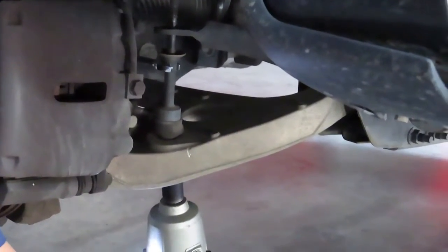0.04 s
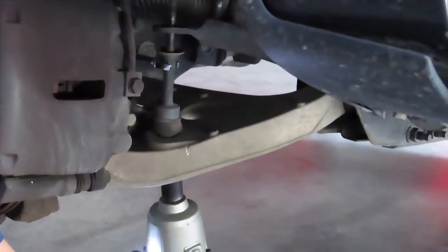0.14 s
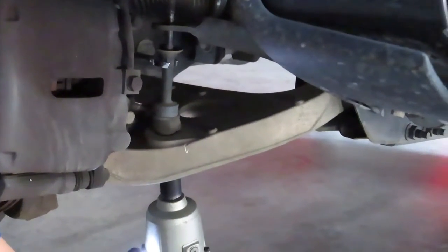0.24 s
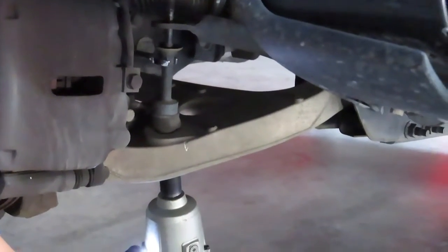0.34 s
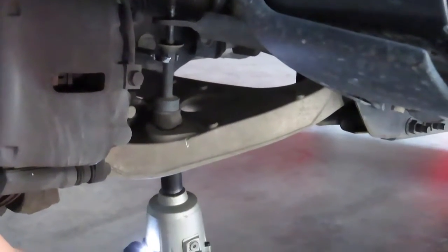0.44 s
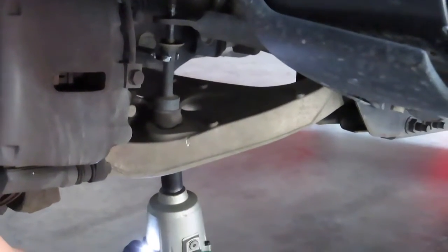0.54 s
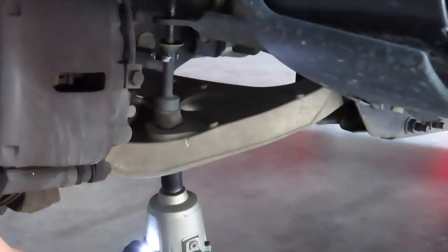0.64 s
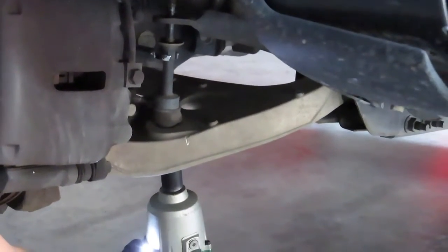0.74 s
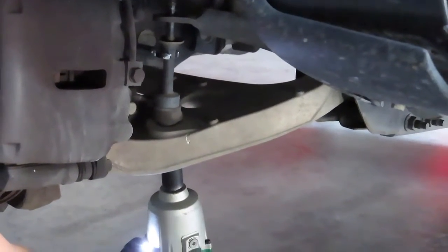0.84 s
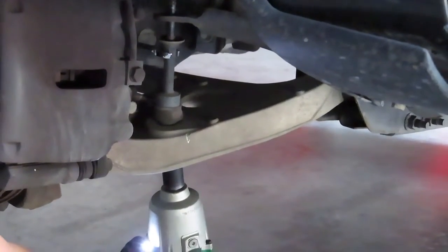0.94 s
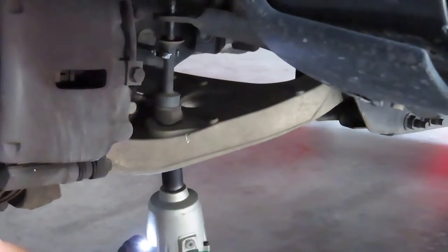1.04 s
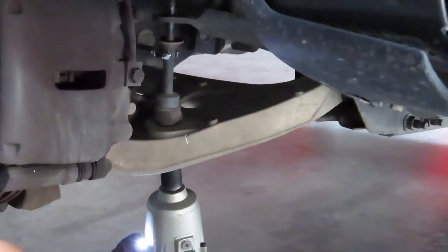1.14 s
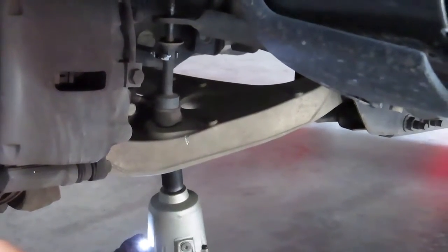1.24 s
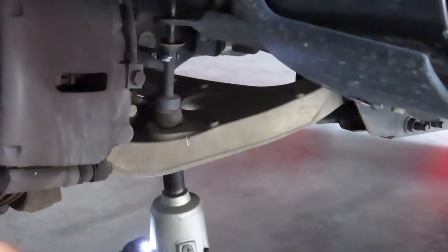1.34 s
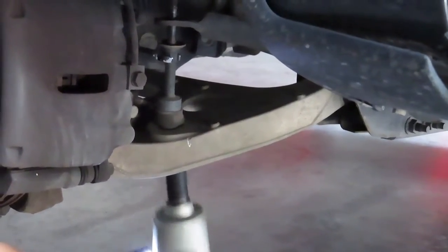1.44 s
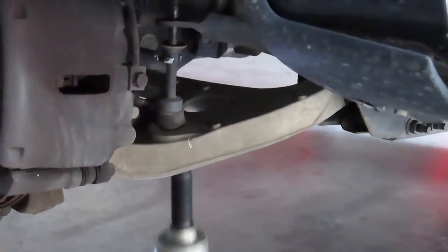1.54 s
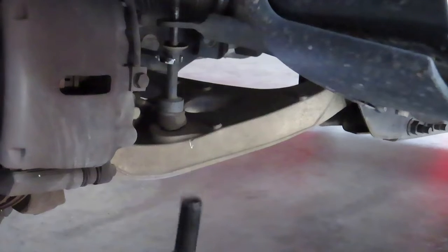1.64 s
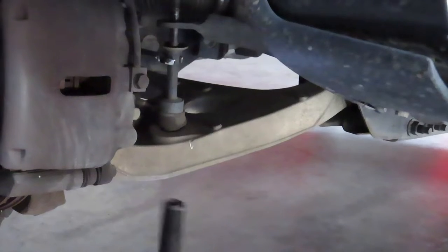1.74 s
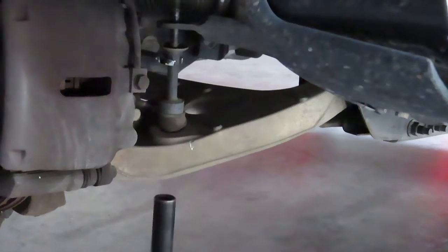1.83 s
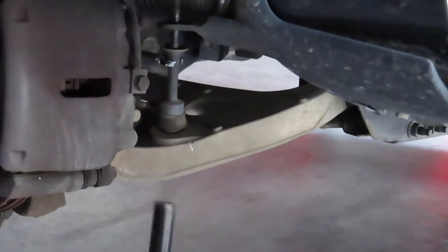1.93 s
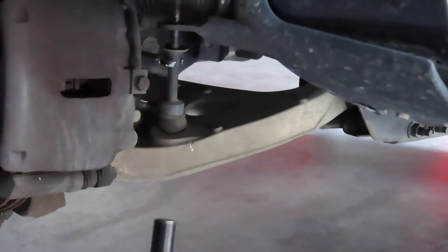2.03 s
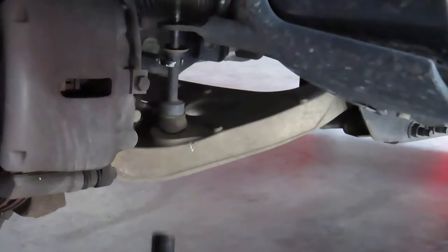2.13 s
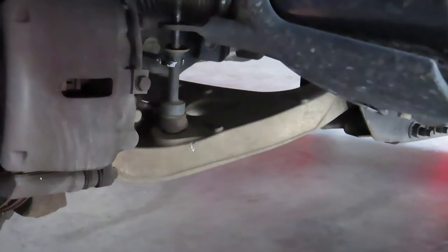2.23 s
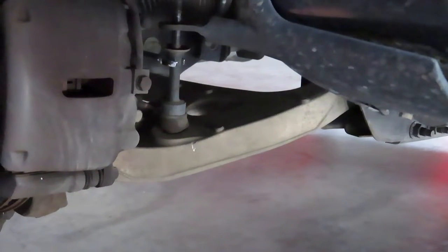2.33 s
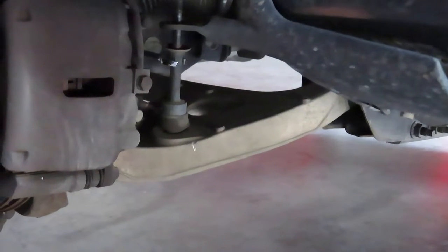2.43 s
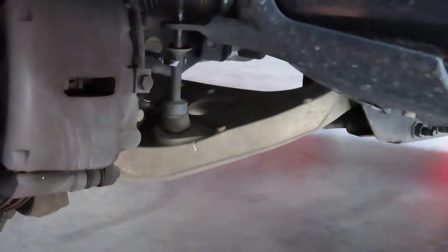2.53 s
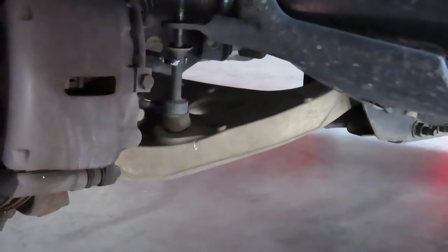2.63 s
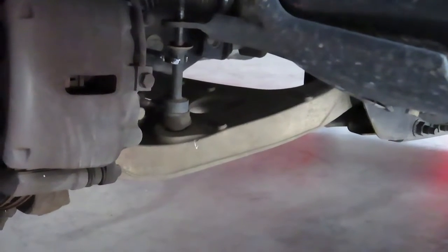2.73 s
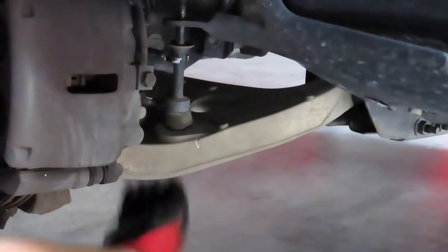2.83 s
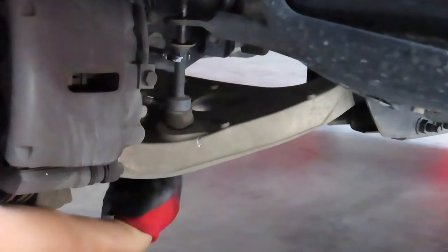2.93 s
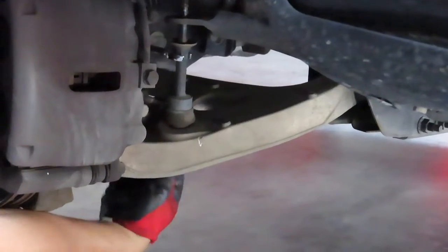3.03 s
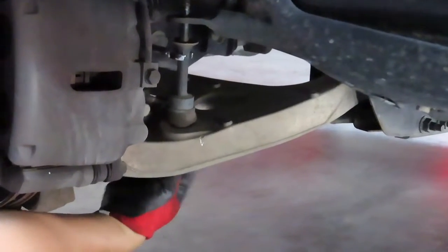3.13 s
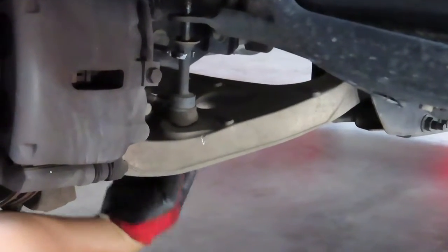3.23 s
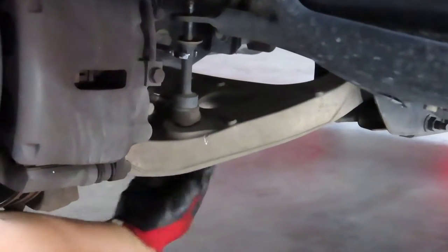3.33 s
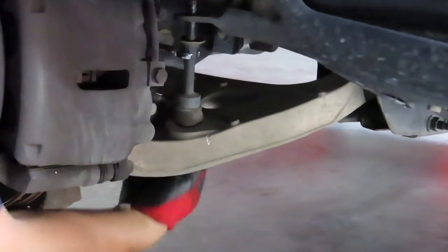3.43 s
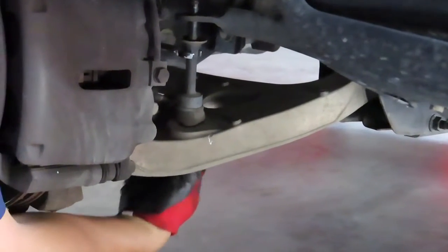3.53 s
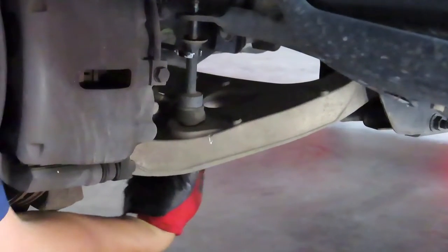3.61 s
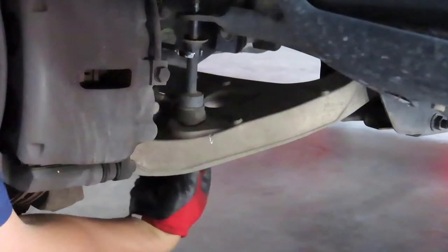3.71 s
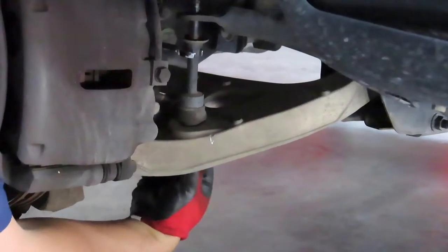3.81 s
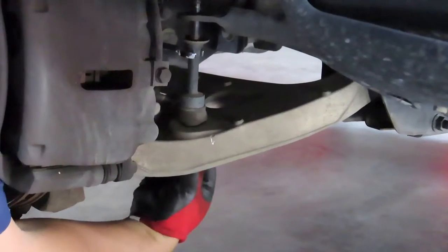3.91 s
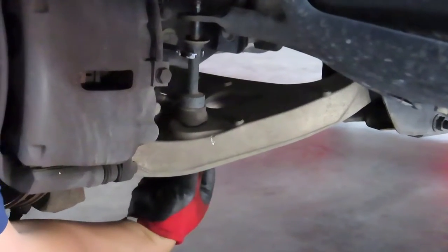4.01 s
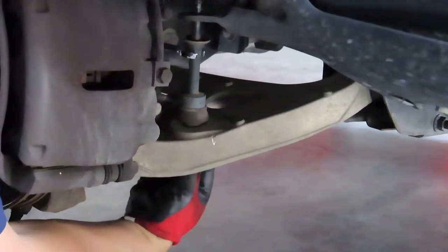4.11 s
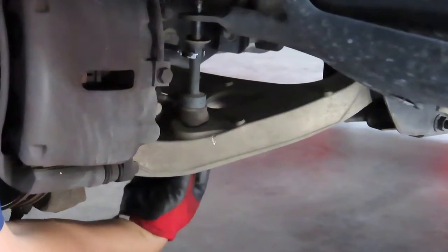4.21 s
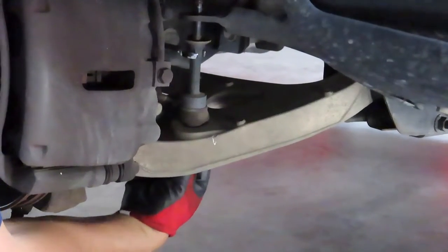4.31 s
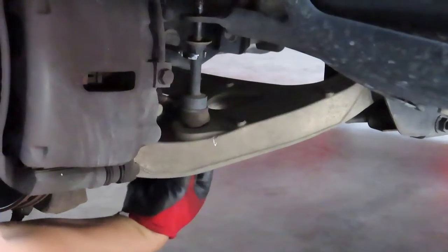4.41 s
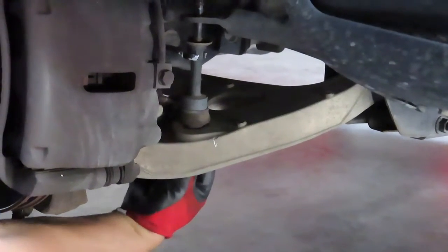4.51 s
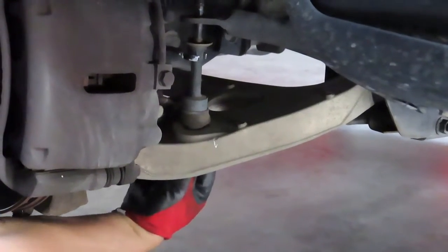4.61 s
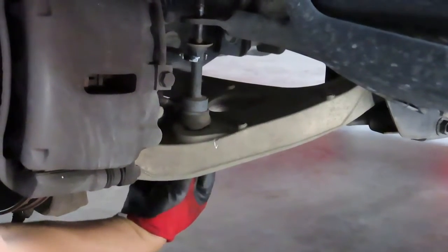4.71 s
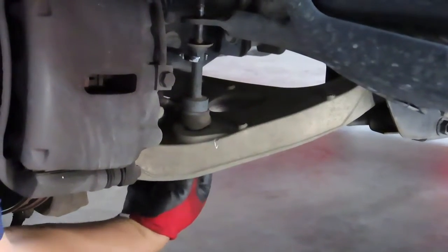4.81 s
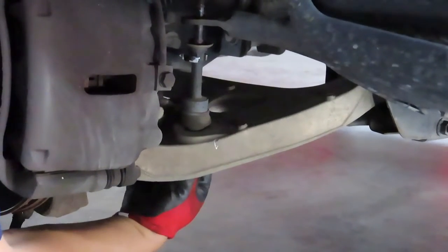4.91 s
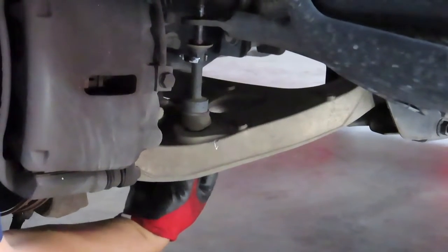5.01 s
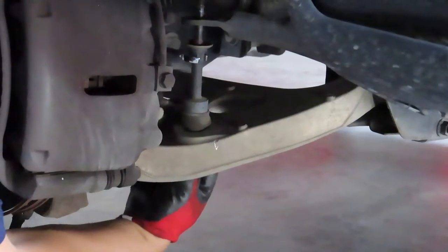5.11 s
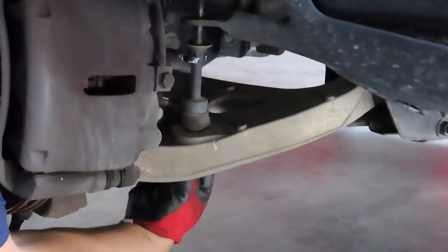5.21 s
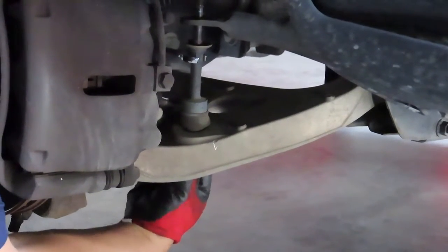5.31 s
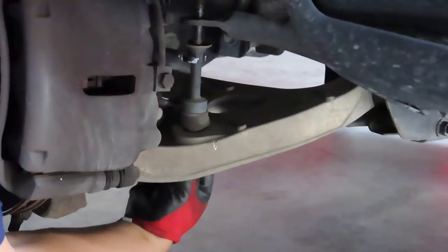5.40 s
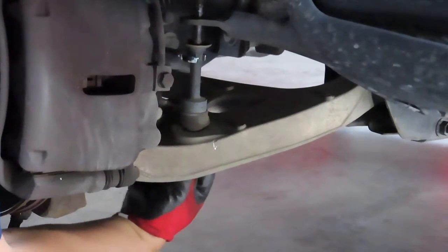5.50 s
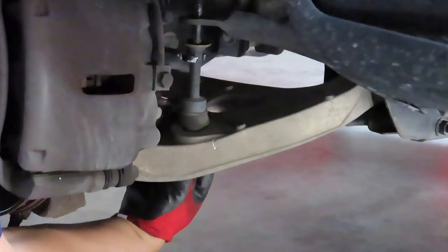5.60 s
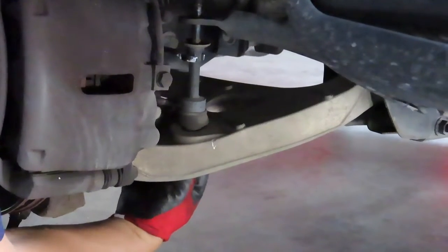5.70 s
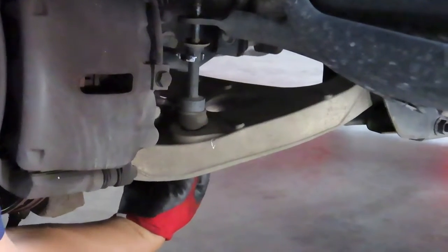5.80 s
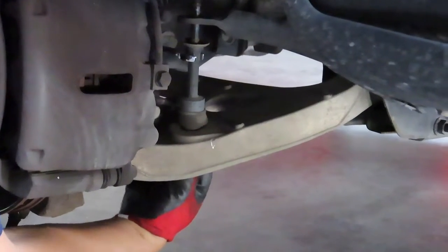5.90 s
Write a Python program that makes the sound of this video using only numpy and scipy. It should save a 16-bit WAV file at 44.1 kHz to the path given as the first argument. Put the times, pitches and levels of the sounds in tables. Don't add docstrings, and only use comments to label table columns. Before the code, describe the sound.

Close under a car, a cordless power tool whines at a steady high pitch while its socket rattles on a nut. It slips off with sharp metallic knocks, speeds up briefly with airy fan rush, then winds down. The tool is laid on concrete with loud clacks and a short scrape, leaving glove rustles, faint bird calls and low distant traffic.

```python
import sys
import numpy as np
from scipy import signal
from scipy.fft import rfft, irfft, next_fast_len
from scipy.io import wavfile
from scipy.ndimage import uniform_filter1d

SR = 44100
rng = np.random.default_rng(int(sys.argv[2]) if len(sys.argv) > 2 else 0)


def store_pcm(level_fs):
    pcm = np.round(np.clip(level_fs, -1, 1) * 32767).astype(np.int16)
    wavfile.write(sys.argv[1], SR, np.atleast_2d(pcm).T)


def to_linear_factor(level_db):
    exponent = np.asarray(level_db, float) / 20
    return 10 ** exponent


N = 262420

# f/Hz, level/dB
TRAFFIC_COLOUR = [(12, -41), (20, -15.5), (59, -4.5), (85, -2.5), (148, -6.5), (171, -11.5), (202, -14.5),
                  (352, -22.5), (667, -21.5), (1580, -34.5), (1770, -35), (4950, -45), (7310, -50.5),
                  (7950, -52), (15500, -64.5)]
# t/s, length/s, top note f/Hz, level/dB
BIRD_CALLS = [
    (3.179, .42, 4460, -48.5),
    (3.629, .43, 4324, -46.5),
]
# part of call/0-1, churr f/Hz, churr level/dB, top note level/dB
CALL_SHAPE = [
    (0, 3304, -6, -34),
    (.17, 3450, -3, -16),
    (.24, 3750, 1, -2),
    (.42, 3950, 0, -2),
    (.52, 3450, 3.5, -6),
    (.7, 3200, -3, -16),
    (1, 3160, -16, -30),
]
# t/s, length/s, f/Hz, glide/Hz, level/dB
FAR_TONES = [
    (5.197, .06, 7420, -150, -59),
    (5.641, 0.346, 1710, 120, -65),
]
# t/s, peak level/dB
RUSTLES = [(3.0779, -37.5), (3.2221, -33.5), (3.362, -30.5), (3.5794, -36.5), (3.6486, -33.5),
           (4.2194, -46), (4.8644, -43), (4.8964, -44), (5.0794, -41), (5.1094, -43)]
# t/s, crack peak level/dB, ring f/Hz, thud peak level/dB, thud f/Hz
KNOCKS = [(1.556, -15.5, 9160, -30, 293), (1.604, -9, 1490, -21, 372), (1.611, -14.5, 9400, -19, 300),
          (2.095, -42, 1508, -18, 170), (2.115, -44, 1500, -22, 125), (2.5613, 1.5, 2960, -6.5, 175),
          (2.562, -18, 620, -23.5, 330), (2.624, 0.5, 2160, -2.5, 338), (2.629, -3, 2900, -6.5, 550),
          (2.648, -19, 3260, -26, 320), (2.688, -17, 2940, -19, 710), (2.7784, -14.5, 900, -17, 500),
          (2.782, -17, 2520, -17, 300), (2.801, -23, 3450, -25, 500), (2.819, -8.5, 2830, -16.5, 691),
          (2.841, -30.5, 2500, -25, 600), (2.889, -25, 3000, -27, 400), (2.893, -32, 2980, -15, 752),
          (2.915, -28, 3020, -24.5, 786), (4.865, -39, 1500, -35, 600), (4.897, -41, 1500, -37, 600)]
# t/s, level/dB
SETTLING = [
    (2.56, -26),
    (2.686, -25.5),
    (2.766, -31),
    (2.886, -32.5),
    (2.95, -54),
]
# f/Hz, level/dB
AIR_COLOUR = [(120, -35), (200, -2.5), (446, -25.5), (653, -2.5), (890, -5), (1190, -5.5), (1590, 1),
              (2130, -5), (3070, 1), (4840, -12.5), (8500, -19), (13200, -33), (15500, -44)]
# f/Hz, level/dB
RATTLE_COLOUR = [(35, -48), (70, -22.5), (150, -9.5), (242, -10), (1050, -11), (1380, -12), (1790, -13),
                 (2150, -16), (2590, -6), (3270, -16), (4120, -16.5), (6260, -23), (9740, -27.5),
                 (15500, -40)]
# f/Hz, width/Hz, level/dB
SOCKET_MODES = [(229.5, 24, -2), (373.5, 14, 6.5), (1403, 170, -3), (1619, 13, 6.5), (2836, 41, -1.5),
                (2880, 26, 4), (3770, 300, -14), (4285, 77, -2.5), (9630, 23, -8), (11400, 100, -18)]
# t/s, f/Hz, level/dB, throb depth/0-1
MESH = [(0, 1413, -19.5, 0.9), (.3, 1394, -20.5, 0.4), (.7, 1389, -20.5, 0.67), (.95, 1403, -21, 0.6),
        (1.15, 1401, -14.5, 0.28), (1.3, 1403, -19, 0.34), (1.5, 1396, -17, 0.32), (1.53, 1405, -31, 0.53)]
# t/s, f/Hz
DRAG = [
    (0, 2578),
    (.2, 2562),
    (.3, 2528),
    (1.1, 2545),
    (1.3, 2560),
    (1.5, 2563),
]
# t/s, level/dB
FACING = [(0, -4.5), (.2, -0.5), (1.24, -1.5), (1.285, -18), (1.32, -1.5), (1.5, -5), (1.56, 0.5),
          (1.635, 2.5), (1.75, -4.5), (1.823, 0.5), (1.87, -6), (1.915, -2), (1.935, -14), (1.96, -1),
          (2.3, -1), (2.56, -0.5)]
# multiple of whine, housing resonance f/Hz, width/Hz, level/dB
MOTOR_LINES = [(1, 2874, 344, -18.5), (1, 2520, 400, -25.5), (1, 1180, 100, -38), (1, 1900, 730, -41),
               (1, 760, 170, -22.5), (2, 5770, 200, -32), (2, 5100, 300, -38), (2, 3650, 450, -23),
               (2, 2900, 1800, -42), (2, 2300, 400, -35), (2, 1700, 350, -31), (2, 780, 350, -21),
               (3, 7550, 870, -30.5), (3, 8650, 300, -34), (3, 5600, 1800, -39), (3, 4300, 1490, -44),
               (5, 13600, 700, -41), (5, 7500, 2500, -49), (5, 4170, 760, -27.5), (1.5, 4200, 250, -32),
               (1.5, 3600, 1196, -42), (2.5, 3800, 1100, -46), (4, 11540, 300, -44), (7, 5000, 3000, -50),
               (.1, 263, 91, -39.5), (.5, 720, 200, -35),
               (.2, 580, 55, -38.5), (.25, 646, 203, -34.5), (.5, 900, 400, -43), (.55, 2300, 100, -43),
              (1.5, 4300, 210, -30.5), (1.5, 4050, 760, -34.5), (2.5, 3900, 2500, -56),
              (4, 5400, 3000, -47), (4, 15000, 1500, -49), (5.31, 15330, 300, -50), (6, 12000, 4000, -51.5),
              (7, 12000, 3000, -58)]
# f/Hz, side minus mid level/dB
NEAR_WIDTH = [(60, -47), (200, -47), (380, -35), (1290, -31.5), (2500, -24.5), (3300, -26), (6400, -22),
              (7000, -7), (15000, -5)]
# f/Hz, side minus mid level/dB
FAR_WIDTH = [(60, -42.5), (110, -44), (200, -17), (380, -5.5), (700, -13), (1290, -7.5), (2380, -6),
             (4400, -5.5), (8120, -3), (15000, -3)]

T, PAD = np.arange(N) / SR, next_fast_len(N)
HZ = np.fft.rfftfreq(PAD, 1 / SR) + 1e-3
SLIP_S, RELEASE_S, STOP_S = 1.522, 1.877, 2.93
LAID_S = 2.59
FREE_HZ = 2888


def unit(x):
    return x / np.sqrt(np.mean(x ** 2))


def to_peak(x, db):
    return x * to_linear_factor(db) / np.max(np.abs(x))


def shape(table):
    hz, db = np.transpose(table)
    return to_linear_factor(np.interp(np.log(HZ), np.log(hz), db))


def peak(hz, width):
    return 1 / (1 + 1j * (HZ / hz - hz / HZ) * hz / width)


def lowpass(hz):
    return 1 / (1 + 1j * HZ / hz)


def through(x, gain):
    return irfft(rfft(x, PAD) * gain, PAD)[:N]


def sweep(hz):
    return 2 * np.pi * np.cumsum(hz) / SR


def after(s, ramp_s):
    return np.clip((T - s) / ramp_s, 0, 1)


def decay(s, fall_s):
    return np.exp(-np.maximum(T - s, 0) / fall_s)


def curves(table, off_db=-120):
    s, *columns = np.transpose(table)
    gate_db = np.interp(T, [s[0] - .02, s[0], s[-1], s[-1] + .03], [off_db, 0, 0, off_db])
    return [np.interp(T, s, c) for c in columns], to_linear_factor(gate_db)


def walk(rate):
    hold = int(SR / rate)
    steps = np.repeat(rng.standard_normal(N // hold + 1), hold)
    slewed = uniform_filter1d(uniform_filter1d(steps, hold), hold)
    return unit(slewed[:N])


def flicker(gain, depth_db, rate):
    out = 0
    for hz in 30 * 2. ** np.arange(10):
        band = np.cos(np.clip(np.log2(HZ / hz), -1, 1) * np.pi / 2)
        noise = through(rng.standard_normal(N), gain * band)
        out = out + noise * to_linear_factor(depth_db * walk(rate))
    return unit(out)


def burst(s, t60, rise):
    age = np.maximum(T - s, 0)
    return rng.standard_normal(N) * (1 - np.exp(-age / rise)) * np.exp(-np.log(1000) * age / t60)


def echo(x, t60, db):
    tail = through(burst(0.0021, t60, 0.0011), lowpass(4000))
    return to_linear_factor(db) * through(x, rfft(tail / np.sqrt(np.sum(tail ** 2)), PAD))


def scatter(x, width):
    paths = burst(0, .3, .0001)
    return through(x, shape(width) * rfft(paths / np.sqrt(np.sum(paths ** 2)), PAD))


def traffic():
    return flicker(shape(TRAFFIC_COLOUR), 0.65, 14) * to_linear_factor(-36.5)


def far_tones():
    out = 0
    for s, length, hz, glide_hz, db in FAR_TONES:
        part = np.clip((T - s) / length, 0, 1)
        pitch = (hz + glide_hz * part) * (1 + .006 * walk(120))
        out = out + to_linear_factor(db) * np.abs(np.sin(np.pi * part)) ** 0.51 * np.sin(sweep(pitch))
    return out


def bird():
    out = 0
    for s, length, note_hz, db in BIRD_CALLS:
        timed = [(s + part * length, *rest) for part, *rest in CALL_SHAPE]
        (hz, churr_db, note_db), gate = curves(timed)
        angle = sweep(hz)
        breath = walk(950) * np.sin(angle) + walk(950) * np.cos(angle)
        churr = breath * to_linear_factor(churr_db + 2.5 * walk(60))
        note = np.sin(sweep(note_hz * (1 + 0.009 * walk(120)))) * to_linear_factor(note_db + 4.5 * walk(40))
        out = out + (0.57 * churr + .8 * note) * gate * to_linear_factor(db)
    return out


def rustles():
    hz, t60_s = 2330, 0.25
    cloth = peak(hz, 0.85 * hz) * lowpass(7000)
    return sum(to_peak(through(burst(s, t60_s, 0.0031), cloth), db - 5.5) for s, db in RUSTLES)


def settle():
    (db,), gate = curves(SETTLING)
    return flicker(peak(340, 220) + 0.73 * peak(750, 310), 2.4, 60) * to_linear_factor(db - 5.5) * gate


def knocks():
    out = 0
    for s, db, hz, thud_db, thud_hz in KNOCKS:
        t60 = 0.071 if s < RELEASE_S else .015 - .0005 * db
        dull = lowpass(1.47 * hz) ** 2 * lowpass(14000)
        ring = peak(hz, 0.69 * hz) + 0.43 * peak(960, 1600)
        crack = through(burst(s, t60, 0.0013), ring * dull)
        body = peak(thud_hz, 30 + 0.22 * thud_hz) + 0.37 * peak(177, 39) + 0.39 * peak(278, 50)
        thud = through(burst(s, 0.0049, 0.00057), body)
        thud = through(thud, lowpass(min(1800, 4 * thud_hz)) ** 2)
        out = out + to_peak(crack, db) + to_peak(thud, thud_db)
    return out


def air(hz):
    low_db, high_db = -27, -31.5
    low_db_per_oct, high_db_per_oct = 3, 4
    octaves, laid = np.log2(hz / FREE_HZ), after(LAID_S - .03, .07)
    puff_db = 7.5 * decay(SLIP_S + .05, 0.033)
    treble = 1 / (1 + (3800 / HZ) ** 4)
    rush = flicker(shape(AIR_COLOUR) * (1 - treble), 0.91, 40)
    rush = rush * to_linear_factor(low_db + low_db_per_oct * octaves - 6 * laid + puff_db)
    hiss = flicker(shape(AIR_COLOUR) * treble, 0.99, 40.16)
    hiss = hiss * to_linear_factor(high_db + high_db_per_oct * octaves - 7 * laid)
    return (rush + hiss) * after(SLIP_S + 0.024, 0.015) * (1 - after(STOP_S, 0.063))


def rattle(spindle):
    taps = rng.standard_normal(N) * to_linear_factor(2.53 * rng.exponential(size=N))
    taps = taps * (1 + 0.11 * np.cos(spindle + .6))
    modes = sum((-1) ** k * to_linear_factor(d) * peak(f, w) for k, (f, w, d) in enumerate(SOCKET_MODES))
    sound = unit(through(taps, shape(RATTLE_COLOUR))) + to_linear_factor(-3) * unit(through(taps, modes))
    parting_shake = after(1.6, .012) * decay(1.612, 0.031)
    return sound * to_linear_factor(-19.5 + 0.4 * walk(25.3)) * (decay(SLIP_S, .05) + 1.14 * parting_shake)


def gears():
    teeth = 66
    (hz, db, depth), gate = curves(MESH)
    angle = sweep(hz)
    spindle = angle / teeth + .3 * walk(12)
    swell = np.cos(spindle + 1.1) + 0.66 * np.cos(2 * spindle + 2.1)
    throb = 1 + depth * to_linear_factor(2.0 * walk(14.6)) * swell
    tone = np.sin(angle + 0.5 * walk(54))
    tone = tone + to_linear_factor(-18.0) * np.sin(3 * angle + .6 * walk(50))
    tone = tone + to_linear_factor(-27) * np.sin(5 * angle + walk(50))
    tone = tone + to_linear_factor(-28) * np.sin(6 * angle + walk(50))
    return 1.13 * to_linear_factor(db + 1.2 * walk(30.02)) * throb * tone * gate, spindle


def speed():
    spin_up_s, coast_s, friction_hz = .028, 1.02, 1600
    s, hz = np.transpose(DRAG)
    run = FREE_HZ - (FREE_HZ - np.interp(T, s, hz)) * decay(SLIP_S, spin_up_s)
    coast = (run + friction_hz) * decay(RELEASE_S, coast_s) - friction_hz
    return np.maximum(coast, 40)


def motor(hz):
    coast_lift_db, load_flutter_db = 8, 2.5
    angle = sweep(hz * (1 + .001 * walk(40.4)))
    lines = {}
    for k, f, w, d in MOTOR_LINES:
        lines[k] = lines.get(k, 0) + to_linear_factor(d) / (1 + ((k * hz - f) * 2 / w) ** 2)
    lift_db = coast_lift_db * (after(RELEASE_S, 0.038) - 1)
    loaded = 1 - after(SLIP_S, 0.021)
    out = 0
    for k, level in lines.items():
        upper_db = (k > 1) * (lift_db + load_flutter_db * loaded * walk(45) + 2.2 * walk(18))
        level = level * to_linear_factor(upper_db + 1.6 * walk(70)) * (k * hz < 15600)
        out = out + level * np.sin(k * angle + .3 * walk(60))
    db = np.interp(T, *np.transpose(FACING)) - 9.5 * after(LAID_S - .02, .04)
    return np.sqrt(2) * out * to_linear_factor(db) * (1 - after(STOP_S - .15, .15))


def scene():
    song = bird() + far_tones()
    far = traffic() + song + echo(song, 0.53, -2.2) + rustles()
    blows = knocks()
    mesh, spindle = gears()
    hz = speed()
    near = settle() + blows + echo(blows, 0.27, -13.0) + air(hz) + rattle(spindle) + mesh + motor(hz)
    side = scatter(near, NEAR_WIDTH) + scatter(far, FAR_WIDTH)
    return np.array([near + far + side, near + far - side])


def band_limit(x):
    return signal.sosfilt(signal.butter(12, 15780, fs=SR, output="sos"), x)


def record(dry):
    cut = signal.ellip(8, .2, 70, 15550, fs=SR, output="sos")
    mix = signal.sosfilt(cut, np.clip(dry, -.97, .97))
    return band_limit(mix)


dry = scene()
out = record(dry)
store_pcm(out)
```